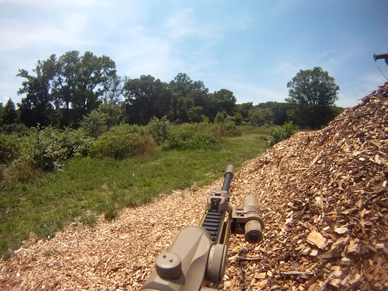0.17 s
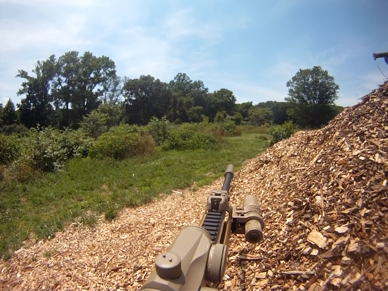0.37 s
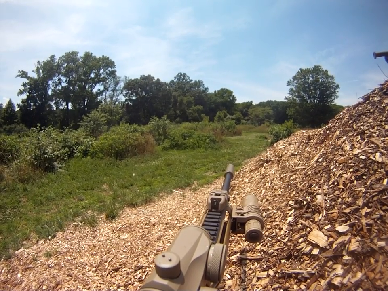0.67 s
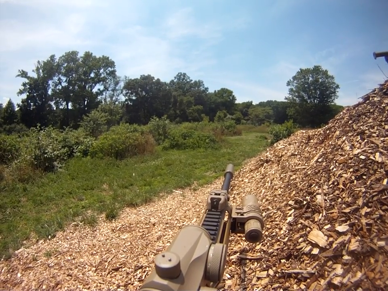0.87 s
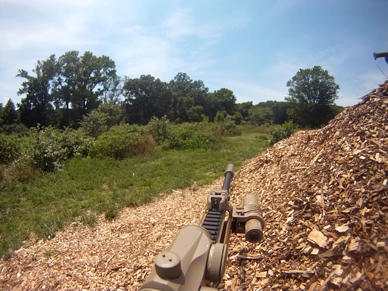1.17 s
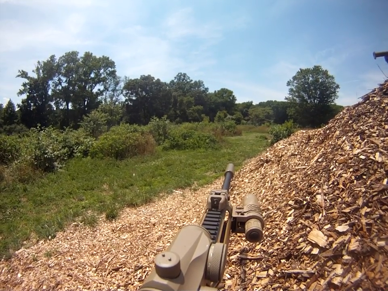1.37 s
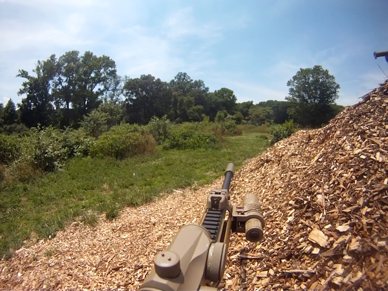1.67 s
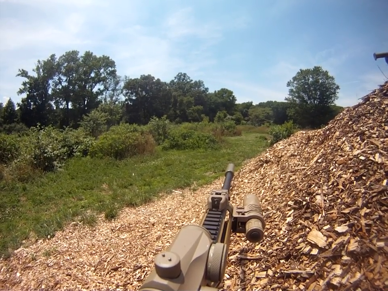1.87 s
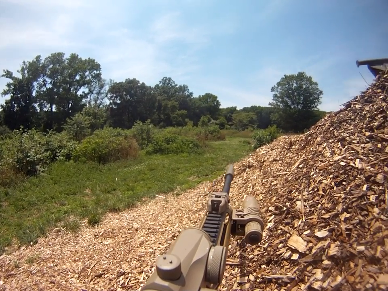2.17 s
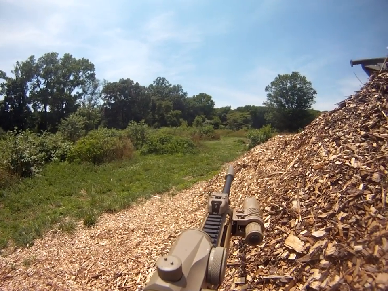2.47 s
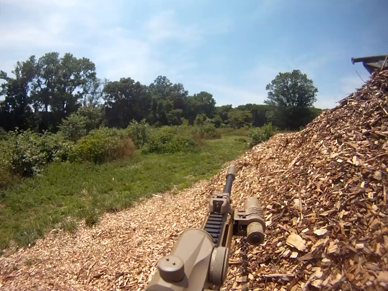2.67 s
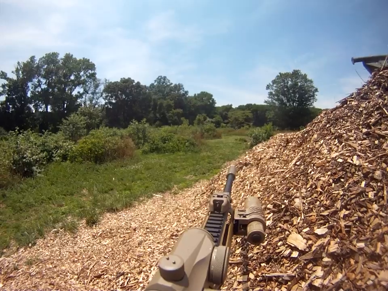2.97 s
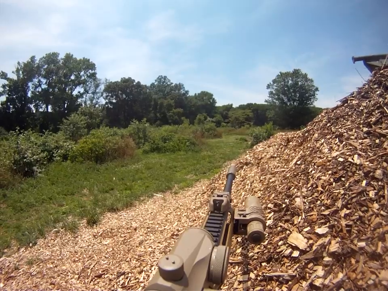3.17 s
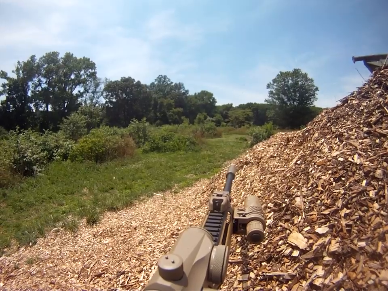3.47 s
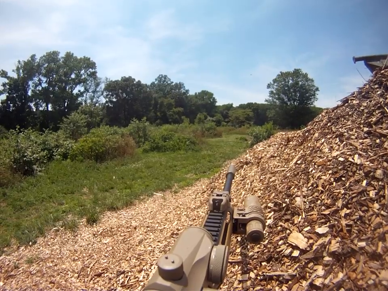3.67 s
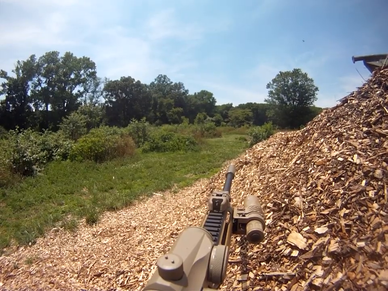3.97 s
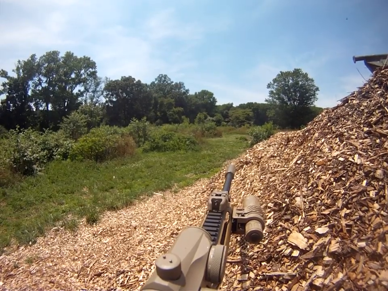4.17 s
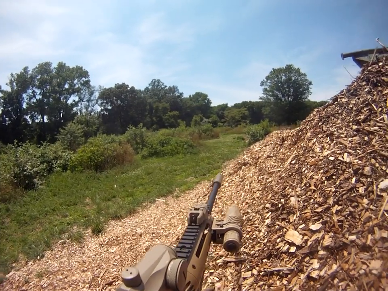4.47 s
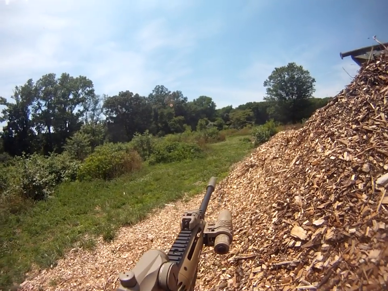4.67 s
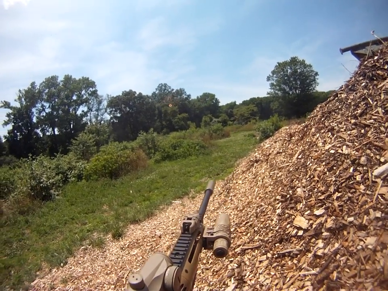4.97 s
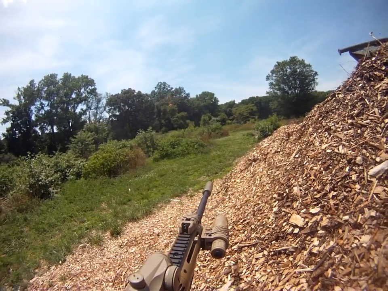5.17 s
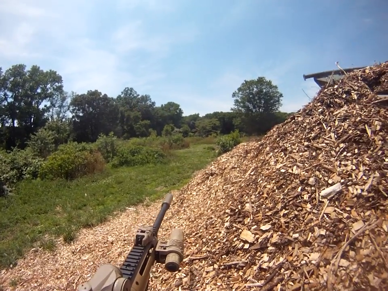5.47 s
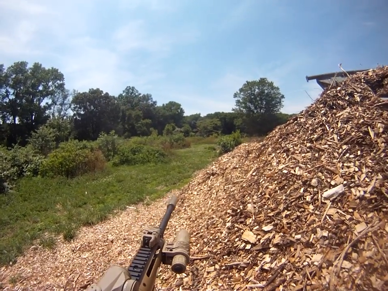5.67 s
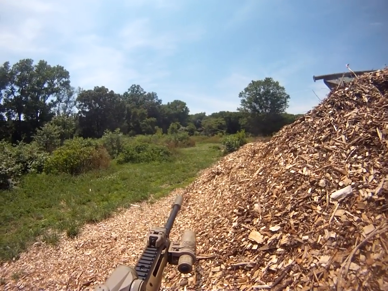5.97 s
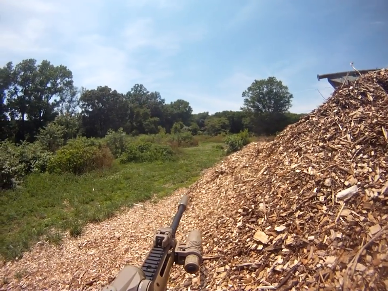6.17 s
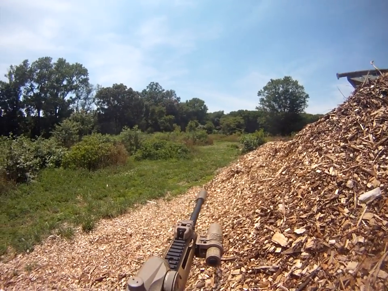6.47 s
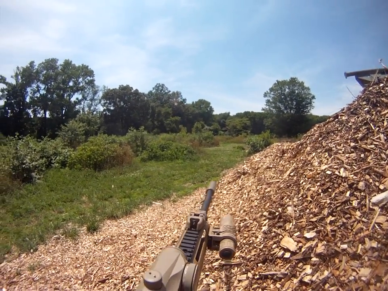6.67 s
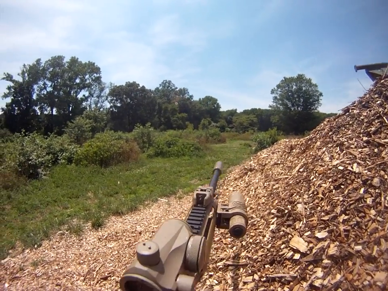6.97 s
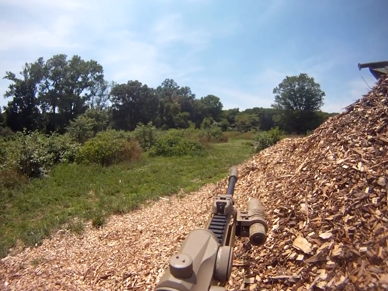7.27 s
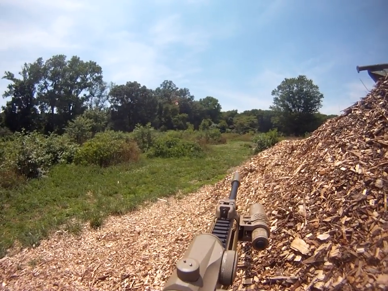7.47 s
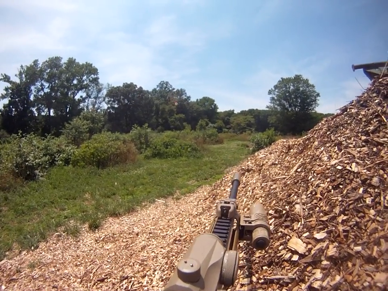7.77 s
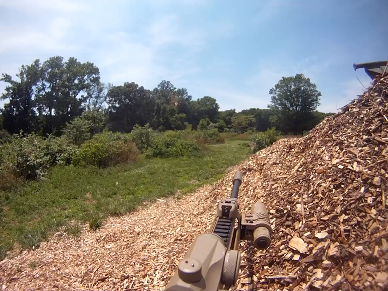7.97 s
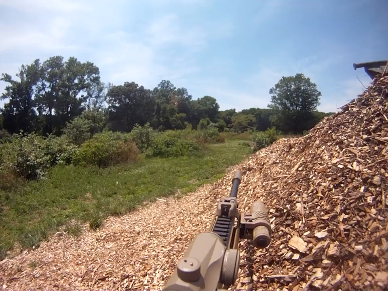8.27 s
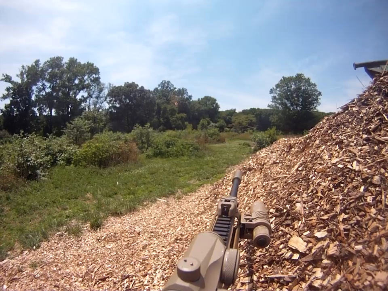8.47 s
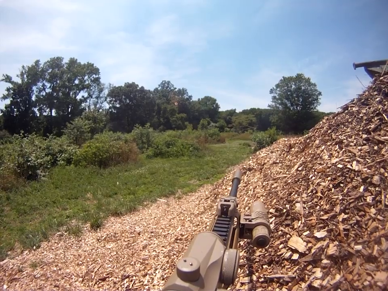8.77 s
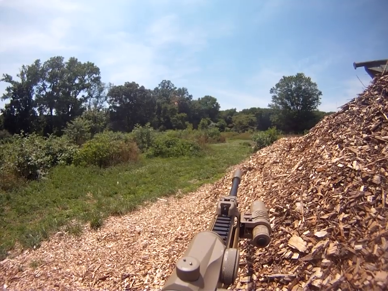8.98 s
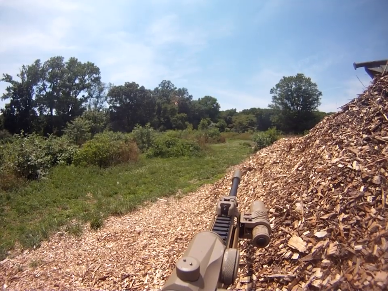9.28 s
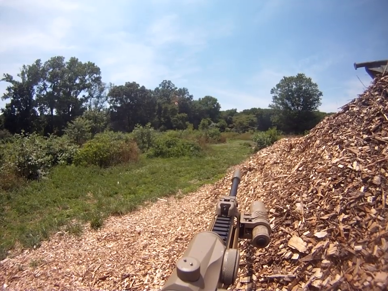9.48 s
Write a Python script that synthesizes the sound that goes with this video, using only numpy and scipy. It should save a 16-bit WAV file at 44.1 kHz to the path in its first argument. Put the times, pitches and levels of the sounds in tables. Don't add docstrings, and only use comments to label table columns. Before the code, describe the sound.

Right under the microphone an airsoft rifle fires quick three-shot bursts, each shot a tick, metallic bolt slam, sharp clipped pop and clattering reseat. Between them, distant electric guns rattle cracks and dull thuds mid-way, then a brighter automatic and a close grinding gearbox gun run together. Trees answer with soft echoes; a light breeze, leaves and a few thin bird whistles lie beneath. The sound is gritty, low-fidelity and slightly overloaded.

```python
import sys
import numpy as np
from scipy import signal
from scipy.fft import rfft, irfft, next_fast_len
from scipy.io import wavfile
from scipy.ndimage import uniform_filter1d, map_coordinates

SR = 44100
rng = np.random.default_rng(int(sys.argv[2]) if len(sys.argv) > 2 else 0)


def linear_from_db(decibels):
    return 10 ** (np.asarray(decibels, float) / 20)


def waveform_to_disk(signal):
    frames = np.transpose(np.atleast_2d(signal))
    scaled = np.clip(frames, -1, 1) * 32767
    samples = np.round(scaled).astype(np.int16)
    wavfile.write(sys.argv[1], SR, samples)


N = 423801
LEAD = SR // 10

# [f/Hz, density/dB]
MURMUR = [(120, -30), (220, -8), (400, 1.1), (620, -1), (900, -8), (1400, -9.5), (2000, -48)]
# [f/Hz, density/dB]
LEAVES = [(590, -37.5), (1000, -31.5), (1180, -10), (1750, -6.5), (1870, -4.5), (2200, -6.5), (2330, -8.5),
          (3050, -4), (3720, -12.5), (5900, -12), (7670, -57), (13000, -120)]


def unit(x):
    return x / np.sqrt(np.mean(x ** 2) + 1e-20)


def along(points, hz):
    f, v = np.transpose(points)
    return np.interp(np.log(hz + 1), np.log(f + 1), v)


def filtered(x, response):
    m = next_fast_len(x.shape[-1] + 8192)
    spectrum = rfft(x, m) * response(np.fft.rfftfreq(m, 1 / SR))
    return irfft(spectrum, m)[..., :x.shape[-1]]


def modes(table):
    return lambda f: sum(linear_from_db(db) * 1j * f * w / (c * c - f * f + 1j * f * w) for c, w, db in table)


def hiss(table, shape):
    return unit(filtered(rng.standard_normal(shape), modes(table)))


def burst(ms, start, db, rise, t60):
    age = np.maximum(ms - start, 0)
    return linear_from_db(db - 60 * age / t60) * (1 - np.exp(-age / rise))


def lay(times, sounds, lead):
    index = np.round(times * SR).astype(int)[:, None] - lead + LEAD + np.arange(sounds.shape[1])
    return np.bincount(index.ravel(), sounds.ravel(), N + SR)[LEAD:LEAD + N]


def wobble(rate):
    return map_coordinates(rng.standard_normal(int(N * rate / SR) + 4), [np.arange(N) * rate / SR])


def rush(spectrum, patchy_db):
    z = signal.stft(rng.standard_normal(N + 512), nperseg=512)[2]
    patches = uniform_filter1d(uniform_filter1d(rng.standard_normal(z.shape), 5, 0), 10, 1)
    x = signal.istft(z * linear_from_db(patchy_db * unit(patches)), nperseg=512)[1][:N]
    return unit(filtered(x, lambda hz: linear_from_db(along(spectrum, hz))))


def push(ms, at, db, width):
    return -linear_from_db(db) * np.exp(-.5 * ((ms - at) / width) ** 2)


def open_air(x, corner_hz):
    return filtered(x, lambda f: 1j * f / (1j * f + corner_hz))


def volley(first, lag, gap, slowing, count):
    spin_up = .2
    k = np.arange(count)
    return first + lag * (1 - spin_up ** k) / (1 - spin_up) + gap * k + slowing * k * (k - 1) / 2


def gain_curve(points):
    s, db = np.transpose(points)
    return linear_from_db(np.interp(np.arange(N) / SR, s, db, -120, -120))


def rifle():
    bursts = [
        -.0231,
        .722,
        1.2206,
        2.6028,
        3.4046,
        7.8311,
        8.6088,
        9.5936,
    ]
    cadence = [0, .0527, .10505]
    step_ms = dict(tick=-11, slam=-8, bounce=-5, nozzle=-1.6, pop=0, vent=3.6, rebound=7.5, back=12.4, stop=18, reseat=24.3, settle=29)
    # [step, level/dB, width/ms, barrel ring/dB]
    pushes = [
        ("tick", -21, .2, -3),
        ("slam", -14, .2, 3),
        ("bounce", -9, .2, -4),
        ("nozzle", -8.5, .14, -4),
        ("pop", 1.5, .1, -5.5),
        ("vent", -15, .15, -4),
        ("rebound", -16, .3, -3),
        ("stop", -13, .3, -6),
    ]
    # [step, rms level/dB, rise/ms, t60/ms, share of clear ring/0-1]
    rattles = [
        ("tick", -14.5, .25, 10, .15),
        ("pop", -19, .4, 35, .25),
        ("stop", -29, .4, 30, .4),
        ("settle", -28, 2.5, 60, .35),
        ("slam", -5.5, .65, 20, .38),
        ("back", -14.5, 1.5, 16, .55),
        ("reseat", -13.5, 1.1, 14, .6),
    ]
    # [f/Hz, width/Hz, level/dB]
    barrel = [(225, 43, -4.5), (542, 63, 0.5), (581.5, 26, -6), (1380, 88, -32), (2000, 330, 6),
              (2720, 320, -9.5)]
    # [f/Hz, width/Hz, level/dB]
    receiver = [(616, 840, 2), (1347, 130, 5), (1590, 440, -3), (2260, 300, 2), (2630, 320, -5),
                (3910, 370, -9), (4800, 500, -14), (5200, 170, -14.5)]
    slam_force = [0.5, 2, 0.5, 1, 0.5, 1, 2, 2]
    reseat_force = [2.5, 1, 3]
    bolt_hz, pause_s, repeat = 2905, 1.2, .55

    pops = np.add.outer(bursts, cadence).ravel()
    lead, shape = 700, (len(pops), 4400)
    ms = (np.arange(shape[1]) - lead) * 1000 / SR
    hasty = (np.diff(pops, prepend=pops[0]) > pause_s)[:, None]
    slam_db = np.repeat(slam_force, len(cadence)) + 3.5 * hasty[:, 0]
    reseat_db = np.tile(reseat_force, len(bursts)) + 0.8 * rng.standard_normal(len(pops))

    def early(step):
        return 5 * hasty * (step == "pop")

    direct, drive = 0, 0
    for step, db, width, ring_db in pushes:
        lost_db = -14 * hasty * (step in ("nozzle", "vent", "rebound"))
        age = ms + early(step)
        direct = direct + push(age, step_ms[step], db + lost_db, width)
        drive = drive + push(age, step_ms[step], db + lost_db + ring_db - 3.5 * hasty, width)
    air = open_air(direct, corner_hz=210) + linear_from_db(2.0) * filtered(drive, modes(barrel))

    wide = np.sqrt(repeat) * hiss(receiver, shape[1]) + np.sqrt(1 - repeat) * hiss(receiver, shape)
    metal = 0
    for step, db, rise, t60, share in rattles:
        force_db = slam_db * (step == "slam") + reseat_db * (step == "reseat")
        late, detune, spread = rng.standard_normal((len(pops), 3)).T[:, :, None]
        age = ms + early(step) - step_ms[step] - 0.19 * late
        t60 = t60 * (1 - 0.16 * hasty * (step in ("slam", "pop")))
        clear = np.sqrt(2) * np.sin(2 * np.pi * bolt_hz * (1 + 0.031 * detune) * age / 1000)
        ring = np.sqrt(share) * clear + np.sqrt(1 - share) * wide
        force = linear_from_db(force_db[:, None] + 1.2 * spread)
        metal = metal + force * burst(age, 0, db, rise, t60) * ring

    coil = hiss([(4100, 570, -3), (5070, 770, 0.0)], shape)
    rasp = linear_from_db(3.2 * rng.standard_normal(shape))
    spring = burst(ms, step_ms["back"], -32, 8.1, 120) * rasp * coil
    return lay(pops, air + metal + spring, lead)


def field():
    # [t/s, level/dB]
    leaves_level = [(0, -51.5), (0.298, -68), (.5, -60.5), (0.799, -65), (0.999, -52.5), (1.151, -67), (1.6, -61.5),
                    (2.4, -66.5), (3.05, -61), (3.55, -64), (3.901, -58.5), (5.3, -56), (5.499, -60.5),
                    (5.8, -57.5), (6.4, -68), (6.9, -64.5), (9.099, -67), (9.61, -66)]
    # [f/Hz, density/dB]
    rumble = [(12, -47.5), (20, -20), (36, -11), (54, 2.5), (108, -7), (145, -6.5), (300, -13), (390, -37),
              (660, -120)]
    breeze_follows, murmur_follows = .3, 0.41

    s, db = np.transpose(leaves_level)
    leaves_db = np.interp(np.arange(N) / SR, s, db)
    swing_db = leaves_db - leaves_db.mean()
    breeze = unit(linear_from_db(2 * wobble(14)) * rush(rumble, patchy_db=0.5))
    breeze = linear_from_db(-58 + breeze_follows * swing_db) * breeze
    murmur_db = -62.5 + murmur_follows * swing_db + 0.72 * wobble(10)
    murmur = linear_from_db(murmur_db) * rush(MURMUR, patchy_db=1.5)
    leaves = linear_from_db(leaves_db + 1.5 * wobble(33)) * rush(LEAVES, patchy_db=2.5)
    return breeze + murmur + leaves


def far_guns():
    # [first t/s, extra first gap/s, gap/s, each gap longer by/s, shots]
    bright_fire = (3.6821, .0232, .1026, .0026, 15)
    dull_fire = (4.2722, .002, .06685, 0, 14)
    # [t/s, crack peak level/dB, thud level against crack/dB, ring
    # f/Hz]
    singles = [
        (3.7338, -38, -29, 2680),
        (3.842, -34.5, -28, 2740),
        (4.1015, -51, -20, 2700),
        (4.1808, -42, 3.5, 940),
        (4.3964, -48, -3, 2000),
        (4.9013, -37, -6, 2600),
        (5.072, -34, -6, 800),
        (5.2077, -37, -2, 870),
        (5.296, -33, -9.5, 1800),
        (5.3534, -39, -14, 1900),
               (1.0475, -39, -34, 2000), (1.1343, -46, -7, 2720), (1.4779, -43, -26, 2860),
             (1.5542, -39.5, -32, 2000), (1.866, -46.5, -20, 3000), (1.976, -53, -19.5, 2750),
             (2.087, -46, -10, 2700), (2.82, -46.5, -22, 5000), (2.892, -56, 0, 2100),
             (3.0258, -50, -4.5, 1800), (3.0594, -46, -24, 5000), (3.0834, -41, -16, 3080),
             (3.1434, -43, -17, 3060), (3.3446, -50, -4, 1730), (6.0876, -42.5, -13, 1640),
             (6.2353, -28.5, -24, 2900), (6.6483, -44.5, -21, 3130), (6.7446, -47.5, -15, 2050),
             (8.9024, -28, -28.5, 3120), (8.9326, -25, -42, 2980), (8.974, -36, -20, 1930),
             (8.994, -47, -16, 3100), (9.0794, -51, -22, 2800), (9.4499, -54, -3.5, 2340)]
    # [f/Hz, width/Hz, level/dB]
    thud_body = [(575, 330, 1), (890, 60, -1.5), (1647, 1300, -3.5)]
    # [f/Hz, width/Hz, level/dB]
    crack_body = [(1730, 280, 7), (2307, 1000, 13), (3120, 130, -19), (5200, 1200, 10)]
    # [t/s, rms level/dB]
    knocks = [
        (3.803, -43),
        (4.014, -35),
        (4.559, -45),
    ]
    bright_gun, dull_gun = (-29, -23.5, 2570), (-40, -0.84, 1760)

    held = []
    for fire, (db, thud_db, hz) in ((bright_fire, bright_gun), (dull_fire, dull_gun)):
        for s in volley(*fire):
            held.append((s, db + 0.6 * rng.standard_normal(), thud_db, hz))
    s, crack_db, thud_db, ring_hz = np.transpose(held + singles)[:, :, None]
    lead = 500
    ms = (np.arange(3000) - lead) * 1000 / SR
    shape = (len(s), len(ms))

    clear = np.clip(-thud_db / 30 - .1, .55, .6)
    detune = 1 + .02 * rng.standard_normal((len(s), 1))
    tone = np.sqrt(2) * np.sin(2 * np.pi * ring_hz * ms / 1000 * detune)
    broad = hiss(crack_body, shape)
    ring = np.sqrt(clear) * tone + np.sqrt(1 - clear) * broad
    spread = burst(ms, 0, crack_db - 30, 3.2, 90) * broad
    crack = burst(ms, 0, crack_db - 0.5, 0.6, 12.8) * ring + spread

    swell = burst(ms, -8, -5, 3, 60) + burst(ms, -.6, 0, .8, 36)
    dull = unit(filtered(hiss(thud_body, shape), modes(thud_body)))
    thud = linear_from_db(crack_db + thud_db + 0.5) * swell * dull

    when, knock_db = np.transpose(knocks)
    wood = hiss([(380, 180, 0.033)], (len(when), len(ms)))
    wood = burst(ms, 0, knock_db[:, None], 4.8, 83) * wood
    return lay(s[:, 0], crack + thud, lead) + lay(when, wood, lead)


def birds():
    # [start t/s, length/s, from f/Hz, to f/Hz, peak level/dB]
    whistles = [
        (2.03, .035, 3700, 4800, -74),
        (2.225, .05, 4100, 5200, -68),
        (2.31, -.04, 3300, 4700, -74),
        (2.525, -.03, 4200, 4495, -66),
        (2.523, 0.066, 4200, 5240, -64),
        (2.968, -.05, 4200, 5300, -60),
        (3.294, -0.077, 3400, 4850, -59),
        (3.34, -.045, 4450, 3700, -58),
        (9.38, -0.12, 3650, 3480, -65.5),
    ]
    edge_db, bend = -10.5, 1.6
    t, song = np.arange(N) / SR, 0
    for s, length, from_hz, to_hz, db in whistles:
        u = np.clip((t - s) / length, 0, 1)
        sounding = (u > 0) * (u < 1)
        flutter = linear_from_db(3.5 * wobble(150) - 1.5)
        swell = linear_from_db(db + edge_db * (2 * u - 1) ** 2) * sounding * flutter
        hz = from_hz + (to_hz - from_hz) * u ** bend
        song = song + swell * np.sin(2 * np.pi * np.cumsum(hz) / SR)
    return song


def motor_grind():
    # [t/s, grind level/dB]
    middle_motor = [
        (6.95, -69.5),
        (7.02, -51.5),
        (7.67, -50.5),
        (7.75, -59),
    ]
    # [t/s, grind level/dB]
    near_motor = [
        (7.68, -54.5),
        (7.74, -41.5),
        (7.9, -40.5),
        (7.97, -38.5),
        (8.68, -39),
        (8.77, -36.5),
        (8.91, -45.5),
        (9.02, -80),
    ]
    # [f/Hz, density/dB]
    teeth_colour = [(530, -44.5), (900, -11.5), (1100, -18.5), (1560, -25), (1920, -9), (2370, -1),
                    (2560, -5.5), (3140, 3), (4270, -20), (5200, -9), (5900, -11.5), (7670, -56),
                    (13000, -120)]
    chatter = linear_from_db(3 * wobble(400))
    teeth = unit(chatter * rush(teeth_colour, patchy_db=0.0))
    clatter = linear_from_db(-10) * rush(LEAVES, patchy_db=1.5)
    drone = linear_from_db(-18) * rush(MURMUR, patchy_db=3.0)
    return (gain_curve(near_motor) + gain_curve(middle_motor)) * (teeth + clatter + drone)


def middle_gun():
    # [first t/s, extra first gap/s, gap/s, each gap longer by/s, shots]
    middle_fire = (6.9687, .0228, .0623, 0, 26)
    s = volley(*middle_fire)[:, None]
    fade_db = -4.5 * np.minimum(s - s[0], 1)
    crack_db = -32 + fade_db + 1.3 * rng.standard_normal(s.shape)
    puff_db = -33.5 - 0.5 * (s == s[0])
    lead = 800
    ms = (np.arange(3200) - lead) * 1000 / SR
    shape = (len(s), len(ms))
    tick = burst(ms, -13.5, -11, .8, 22) * hiss([(2300, 700, -3), (5000, 400, 0.1)], shape)
    tick[0] = 0
    strike = burst(ms, 0, -3, 1.0, 29) + burst(ms, 6.4, -39.0, .6, 25)
    crack = strike * hiss([(2000, 470, 19.5), (3200, 500, 21), (5000, 900, 5)], shape)
    pop = push(ms, 1.9, 3.7, 0.068)
    body = filtered(pop, modes([(110, 63, 7.5), (587, 160, -2.5), (1030, 240, -1.5)]))
    puff = linear_from_db(-2.5) * open_air(pop, corner_hz=300) + linear_from_db(7.5) * body
    return lay(s[:, 0], linear_from_db(crack_db) * (tick + crack) + linear_from_db(puff_db) * puff, lead)


def near_gun():
    # [first t/s, extra first gap/s, gap/s, each gap longer by/s, shots]
    near_fire = (7.758, .0085, .0745, 0, 16)
    contact_ms = [-6.5, -1, 20.5, 26, 33, 41]
    # [rms level/dB, rise/ms, t60/ms]
    contacts = [
        (-36, .5, 15),
        (-26, .6, 16),
        (-26, .6, 14),
        (-33, .6, 20),
        (-33, 1.5, 30),
        (-33, .6, 15),
    ]
    lead = 600
    ms = (np.arange(3600) - lead) * 1000 / SR
    thump = push(ms, -4.6, -30, .5) - push(ms, -1.3, -32, .6) + push(ms, 1.9, -30, .4)
    thump = thump + linear_from_db(2.5) * filtered(thump, modes([(450, 230, 0.1)]))
    s = volley(*near_fire)
    shape = (len(s), len(ms))
    teeth = hiss([(2100, 360, -2.2), (3300, 750, 0.23), (5000, 570, 0.78)], shape)
    mesh = sum(burst(ms, at, *row) for at, row in zip(contact_ms, contacts)) * teeth
    mesh[-1] *= ms < 12
    snap = burst(ms, -.6, -29, .4, 12) * hiss([(2000, 900, -2.5), (4600, 1500, 0.1)], shape)
    force = linear_from_db(-0.5 + 1.1 * rng.standard_normal((len(s), 1)))
    return lay(s, force * open_air(thump, corner_hz=60.2) + mesh + snap, lead)


def scatter(x, delay, stretch):
    # [f/Hz, t60/s]
    decay = [(300, 0.18), (1500, 0.19), (3000, 0.56), (5500, .25)]
    hz, t, z = signal.stft(rng.standard_normal(SR // 2), SR, nperseg=256)
    fade = linear_from_db(-60 * t / (stretch * along(decay, hz)[:, None]))
    tail = signal.istft(z * fade, SR, nperseg=256)[1]
    late = np.pad(x, (int(delay * SR), 0))
    return signal.fftconvolve(late, tail / np.linalg.norm(tail))[:N]


def scene():
    own, far, middle = rifle(), far_guns(), middle_gun()
    ground = linear_from_db(-25) * scatter(own, 0.0082, .35)
    tree_line = linear_from_db(-43) * scatter(own, .238, .45)
    woods = linear_from_db(-13) * scatter(far, 0.028, 1.6) + linear_from_db(-6.5) * scatter(middle, 0.02, 2.1)
    guns = own + ground + tree_line + far + middle + woods + near_gun() + motor_grind()
    return (guns + birds() + field())[None]


def top_cut(x):
    return signal.sosfilt(signal.butter(12, 16450, fs=SR, output="sos"), x)


def record(dry):
    clock_hz = 12000
    base = filtered(dry, lambda hz: linear_from_db(along([(5200, 0.5), (5600, -7.0), (5950, -8.5), (6050, -45.0)], hz)))
    base = np.clip(base, -1.05, 1.05)
    sampled = base * (1 + 2 * np.cos(2 * np.pi * clock_hz * np.arange(N) / SR))

    def hold(hz):
        return np.sinc(hz / clock_hz) / np.sinc(hz / (4 * clock_hz))

    def top(hz):
        return linear_from_db(along([(15250, 0.5), (15450, -19), (16350, -25.5), (16500, -71.5)], hz))

    held = filtered(sampled, lambda hz: hold(hz) * top(hz))
    return top_cut(np.clip(held, -1, 1))


dry = scene()
out = record(dry)
waveform_to_disk(out)
```